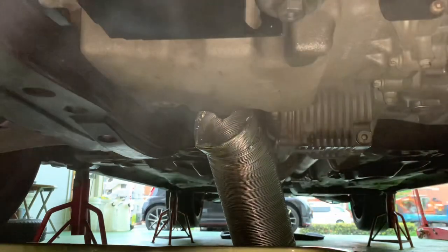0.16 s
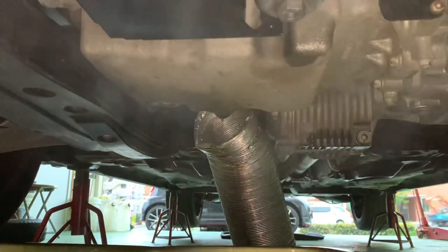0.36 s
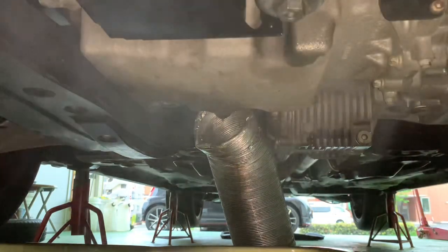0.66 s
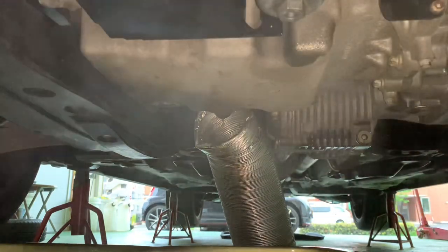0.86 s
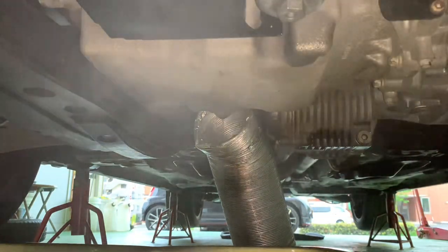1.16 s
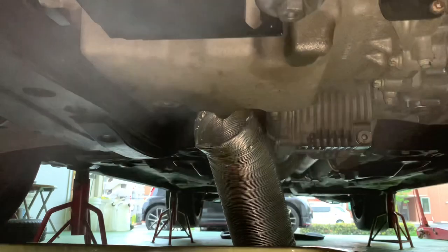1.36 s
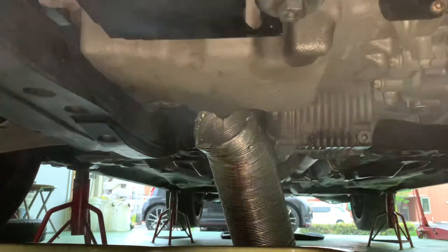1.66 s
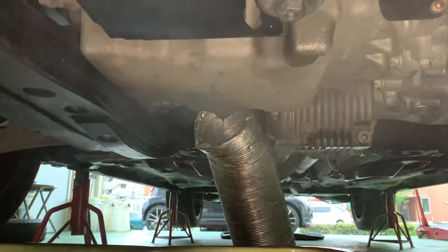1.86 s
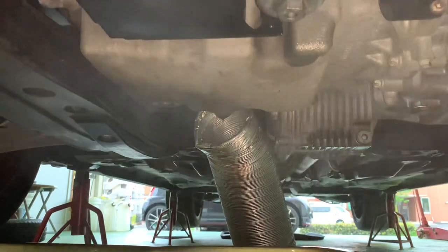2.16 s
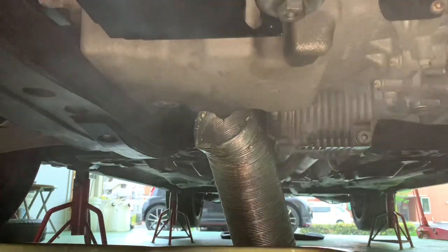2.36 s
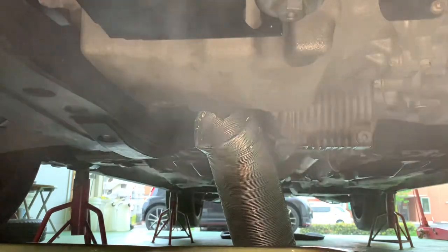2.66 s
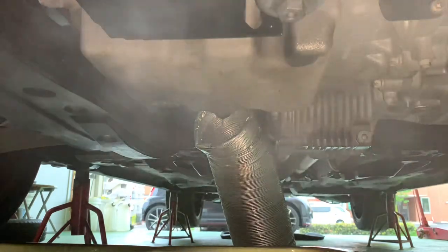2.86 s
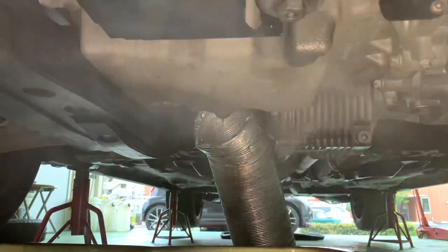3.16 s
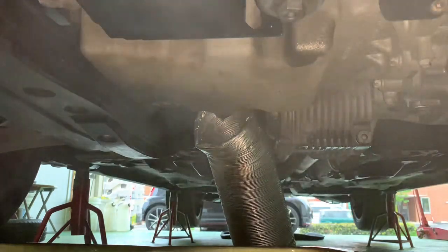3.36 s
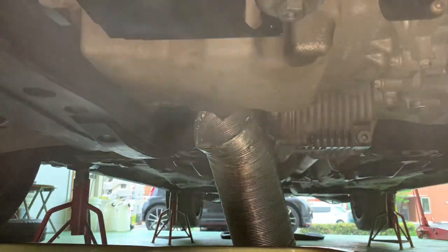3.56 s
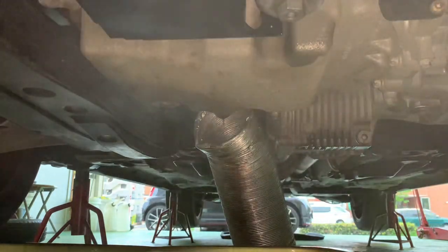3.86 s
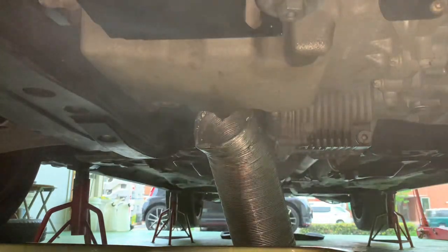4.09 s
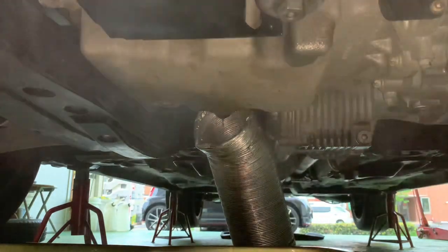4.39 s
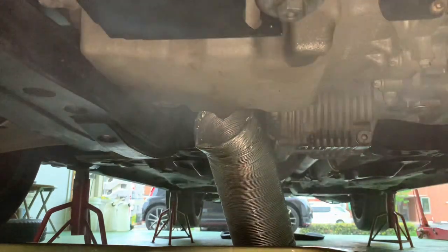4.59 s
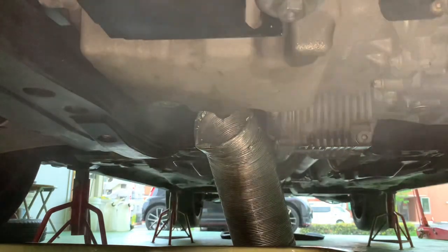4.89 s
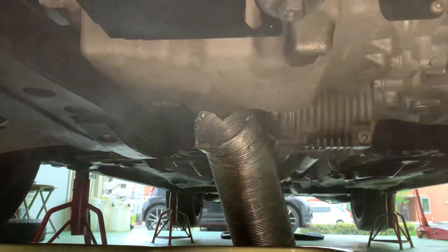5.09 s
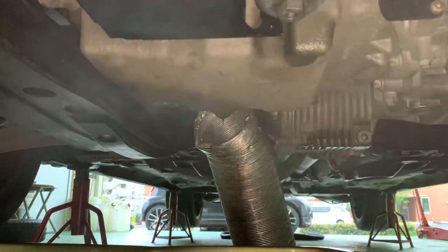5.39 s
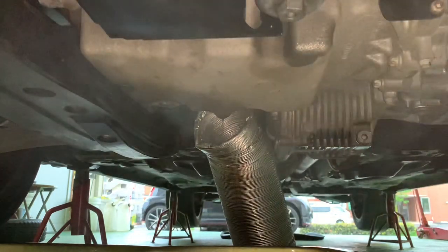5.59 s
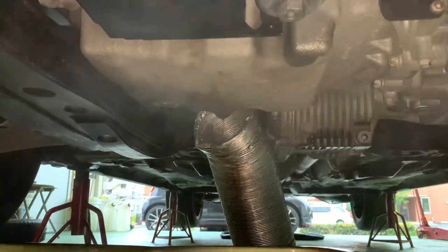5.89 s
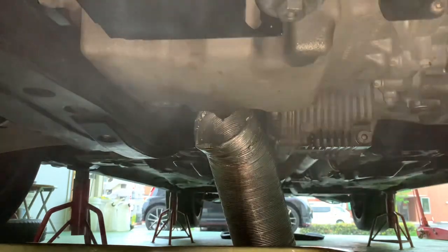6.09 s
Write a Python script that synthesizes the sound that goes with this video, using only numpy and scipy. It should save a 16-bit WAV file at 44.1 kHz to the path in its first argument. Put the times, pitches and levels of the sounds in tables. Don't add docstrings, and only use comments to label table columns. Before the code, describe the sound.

From 0 to about 6 seconds, a steady rush of vapour hisses from a car engine into a wide ribbed hose, heard from the workshop floor beneath the raised car. The hiss is bright, dense and finely grainy, leaning right, with tiny flutters but no breaks. Below it, air booms in the hose as a soft, unpitched low hum, while the gap under the car, the sump and the hose ribs add hollow, breathy colour. The start is slightly stronger, easing over the first second; afterwards the low part sinks very gently and the hiss holds. Far traffic rumbles weakly outside. Faint low engine notes swell around 0.7, 1.3, 2 and 2.6 seconds, and a barely noticeable deep door thud comes near 2.8. Short close reflections and a diffuse room wash surround everything, and the flow continues evenly to the end.

```python
import sys
import numpy as np
from scipy import signal
from scipy.fft import rfft, irfft, next_fast_len
from scipy.io import wavfile
from scipy.ndimage import uniform_filter1d

SR = 44100
rng = np.random.default_rng(int(sys.argv[2]) if len(sys.argv) > 2 else 0)


def bounce(signal):
    frames = np.transpose(np.atleast_2d(signal))
    limited = np.clip(frames, -1, 1)
    pcm = np.round(limited * 32767).astype(np.int16)
    wavfile.write(sys.argv[1], SR, pcm)


def gain_from_db(level_db):
    decades = np.asarray(level_db, float) / 20
    return 10 ** decades


N = 275184
SIZE = next_fast_len(N)
HZ = np.arange(SIZE // 2 + 1) * SR / SIZE
T = np.arange(N) / SR

# [f/Hz, level/dB per Hz]
JET_SPECTRUM = [(3000, -100), (5500, -83.5), (7000, -68), (8000, -68), (8500, -65.5), (9100, -63.5),
                (10000, -64), (10500, -68), (12550, -68.5), (12900, -74.5), (15500, -72.5), (17000, -78)]
# [f/Hz, level/dB per Hz]
ROAR_SPECTRUM = [(150, -73.5), (178, -57.5), (187, -55), (245, -51), (290, -56.5), (305, -59), (420, -62),
                 (480, -71.5), (530, -73.5), (700, -99)]
# [f/Hz, level/dB per Hz]
RUMBLE_SPECTRUM = [(18, -97), (30, -78), (45, -65.5), (70, -68.5), (95, -60), (140, -60.5), (168, -65),
                   (200, -69), (260, -100)]
# [f/Hz, level/dB per Hz]
DIFFUSE_SPECTRUM = [(25, -105), (100, -77), (240, -68.5), (400, -72), (800, -92), (1500, -75), (2500, -79),
                    (3250, -74.5), (4000, -74.5), (7000, -75), (10000, -75), (12500, -77), (16000, -79)]
# [f/Hz, width/Hz, share of amplitude left/0-1]
FLOOR_NULLS = [(174, 12, .3), (605, 50, .28), (737, 61, .57), (935, 40, .5), (1335, 30, .5),
               (1485, 140, .53), (1800, 30, .45), (2810, 79, .33), (3122, 55, .5), (4750, 40, .7),
               (4885, 40, .55), (5230, 60, .6), (6520, 60, .6), (6990, 80, .45)]
# [delay/ms, level/dB]
CLOSE_ECHOES = [(1.201, -25.6), (1.449, -29.1), (1.572, -25.8), (1.827, -20.8), (2.144, -31.0),
                (2.33, -29.6), (2.456, -26.1), (3.308, -27.2), (3.786, -29.1), (4.284, -28.9),
                (4.524, -30.5), (4.729, -28.1), (4.975, -25.9), (6.168, -29.9), (7.331, -30.3),
                (7.994, -31.1)]
# [f/Hz, width/Hz, level/dB, left minus right/dB, left lead/rad]
GAP_RINGS = [(597, 30, -0.5, 9.0, 2.0), (611, 69, 2.5, 0.0, -0.1), (805, 279, -15.7, 0.9, 3.0),
             (986, 38, -2.0, -7.1, 0.1), (1151, 124, -14.6, 0.4, 0.3), (1276, 61, -14.1, 9.0, 2.3),
             (1389, 41, -2.3, -2.2, -2.0)]
# [f/Hz, width/Hz, level/dB, left minus right/dB, left lead/rad]
SUMP_RINGS = [(1537, 30, -12.4, 9.0, -0.4), (1715, 129, -7.5, -0.6, 0.8), (1795, 67, -11.2, 1.6, 2.9),
              (1918, 91, -7.5, -0.5, 0.5), (2085, 38, -10.1, 3.6, 3.1), (2186, 37, -10.6, -1.1, 0.0),
              (2403, 258, -12.2, 2.2, 2.2), (2591, 129, -3.5, 1.7, 0.55), (2712, 41, -4.0, -5.2, 0.6),
              (2980, 84, -2.8, -4.1, 1.7)]
# [f/Hz, width/Hz, level/dB]
HOSE_RINGS = [(3317, 103, -12.8), (3621, 152, -7.6), (3939, 214, -12.7), (4131, 114, -8.4),
              (4574, 230, -7.9), (4825, 48, -10.8), (5070, 179, -8.1), (5406, 178, -11.8),
              (5704, 283, -7.4), (6147, 54, -9.6), (6399, 211, -9.7), (6779, 299, -8.4), (7114, 83, -1.6)]
# [t/s, half length/s, f/Hz, glide/(Hz/s), level/dB]
STREET_DRONES = [
    (0.698, 0.18, 98, -6, -38),
    (1.3, 0.16, 96.3, -3, -41.5),
    (1.95, 0.37, 139, -4, -35.5),
    (2.6, 0.16, 121.4, 5, -36),
    (2.833, 0.096, 43.6, 5, -35),
]
# [from f/Hz, to f/Hz, centre level/dB, side level/dB]
STEREO_THINNING = [(3150, 3260, -3, 0), (3260, 3340, -9, 0), (3340, 3480, -5, 0), (5560, 5900, -2, 0),
                   (5960, 6100, -5.5, 0), (6600, 6720, -3, 0), (6880, 7000, -2, 0), (7000, 7500, -1.5, 0),
                   (8960, 9650, 0, -40), (9650, 10000, 0, -2), (11050, 12080, -40, 0),
                   (12080, 12400, -5, 0), (12750, 13050, -1.5, 0), (13050, 13400, 0, -2),
                   (13400, 14470, 0, -40), (14470, 15150, 0, -6.5), (15150, 15500, -1, 0),
                   (15500, 15800, -3, 0)]


def noise():
    re, im = rng.standard_normal((2, len(HZ)))
    return (re + 1j * im) * np.sqrt(SIZE * SR) / 2


def colour(points):
    hz, db = np.transpose(points)
    return gain_from_db(np.interp(np.log(HZ + 1), np.log(hz), db))


def walk(rate_hz):
    hold = int(SR / rate_hz)
    levels = rng.standard_normal(N // hold + 1)
    steps = np.repeat(levels, hold)[:N]
    slewed = uniform_filter1d(uniform_filter1d(steps, hold), hold)
    return slewed / slewed.std()


def sound(spectrum, db, flicker_db, rate_hz):
    level_db = db - np.mean(db) + flicker_db * walk(rate_hz)
    return irfft(spectrum, SIZE)[..., :N] * gain_from_db(level_db)


def settle(start_db, tau_s, sag_db_per_s):
    return start_db * np.exp(-T / tau_s) - sag_db_per_s * T


def delay(ms):
    return np.exp(-2j * np.pi * HZ * ms / 1000)


def paths():
    lift_db = -3
    return 1 + sum(gain_from_db(db + lift_db) * delay(ms) for ms, db in CLOSE_ECHOES)


def nulls():
    gain = np.ones(len(HZ))
    for hz, width, share in FLOOR_NULLS:
        gain = gain * (1 - (1 - share) / (1 + (2 * (HZ - hz) / width) ** 2))
    return gain


def tilt(left_db):
    return gain_from_db(np.array([[left_db], [-left_db]]))


def jet(db):
    hiss = noise() * colour(JET_SPECTRUM) * paths()
    ports = np.array([hiss * delay(0.218), hiss])
    lower = 1 / (1 + (HZ / 11000) ** 12)
    spit = gain_from_db(0.93 * walk(220))
    return spit * sound(ports * lower, db, 0.35, 14) + sound(ports * (1 - lower), db, 0.61, 13)


def ringing(table):
    base_db = -60.5
    ports = np.zeros((2, len(HZ)), complex)
    for hz, width, ring_db, pan_db, lead in table:
        resonance = 1 / (1 + (1.3 * (HZ - hz) / width) ** 2)
        ring = noise() * gain_from_db(base_db + ring_db) * resonance
        left = gain_from_db(pan_db / 2) * np.exp(1j * lead)
        right = gain_from_db(-pan_db / 2)
        ports = ports + ring * np.array([[left], [right]])
    return ports * nulls()


def rings(db):
    pan_db, lead_rad = -4, 2.11
    gap, sump = ringing(GAP_RINGS), ringing(SUMP_RINGS)
    hose = ringing([(*rib, pan_db, lead_rad) for rib in HOSE_RINGS]) * paths()
    return sound(gap, db, 0.59, 10) + sound(sump, db, 0.68, 9.2) + sound(hose, db, 0.84, 5)


def roar(db):
    return sound(noise() * colour(ROAR_SPECTRUM) * nulls(), db, 0.46, 7.0) * tilt(-.2)


def shop(db):
    scattered = np.array([noise(), noise()]) * colour(DIFFUSE_SPECTRUM)
    return sound(scattered * nulls() * paths(), db, 0.21, 5.9)


def street():
    leaving_db = settle(1.5, 0.37, 0.55)
    out = sound(noise() * colour(RUMBLE_SPECTRUM) * nulls(), leaving_db, 0.22, 7.6)
    for s, half_s, hz, glide, db in STREET_DRONES:
        t = T - s
        swell = gain_from_db(db) * np.exp(-(t / half_s) ** 2)
        out = out + swell * np.sin(2 * np.pi * (hz + glide * t / 2) * t)
    return out * tilt(-.45)


def scene():
    surge_s = .5
    hiss_db = settle(1, surge_s, -0.08)
    ring_db = settle(.8, surge_s, 0.06)
    roar_db = settle(2.0, surge_s, 0.26)
    return jet(hiss_db) + rings(ring_db) + roar(roar_db) + shop(ring_db) + street()


def low_pass(x):
    return signal.sosfilt(signal.butter(12, 15770, fs=SR, output="sos"), x)


def record(dry):
    top = signal.ellip(14, .2, 80, 15720, fs=SR, output="sos")
    bass = signal.butter(5, 27, "high", fs=SR, output="sos")
    left, right = signal.sosfilt(np.vstack([top, bass]), dry)
    whole = np.array([left + right, left - right]) / 2
    gain = np.ones((2, len(HZ)))
    for low_hz, high_hz, mid_db, side_db in STEREO_THINNING:
        band = (HZ > low_hz) & (HZ < high_hz)
        gain[:, band] = gain_from_db(np.array([[mid_db], [side_db]]))
    mid, side = irfft(rfft(whole, SIZE) * gain, SIZE)[:, :N]
    spared = np.exp(-((T - 3.05) / .026) ** 4)
    mid = mid + spared * (whole[0] - mid)
    return low_pass(np.array([mid + side, mid - side]))


dry = scene()
out = record(dry)
bounce(out)
```